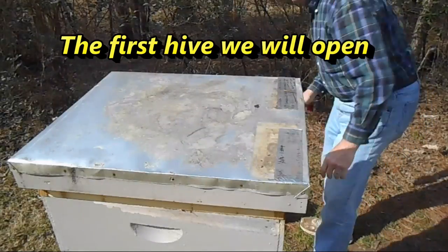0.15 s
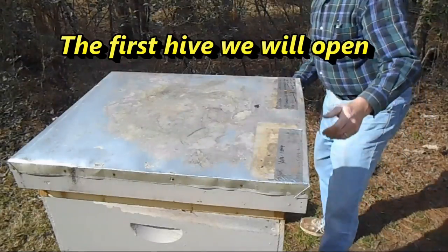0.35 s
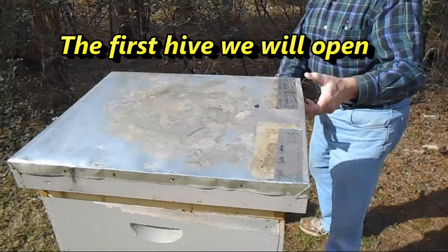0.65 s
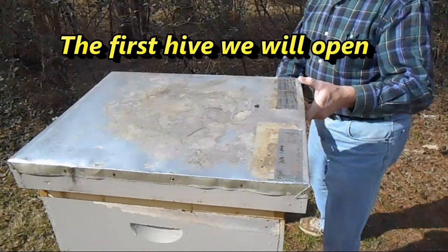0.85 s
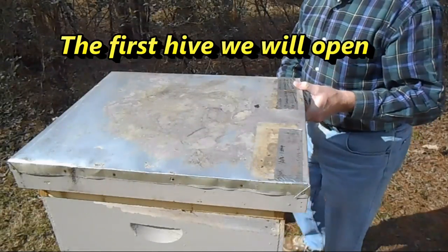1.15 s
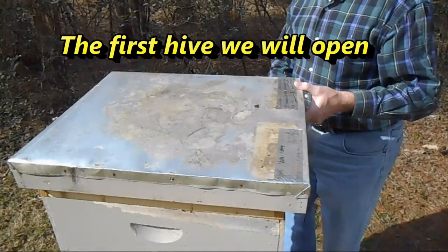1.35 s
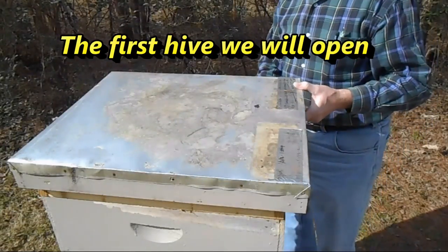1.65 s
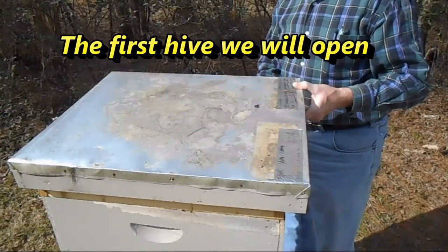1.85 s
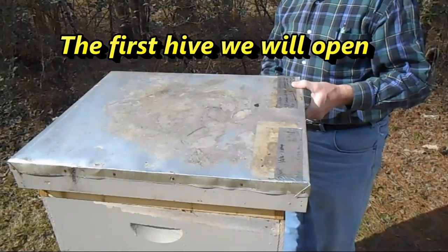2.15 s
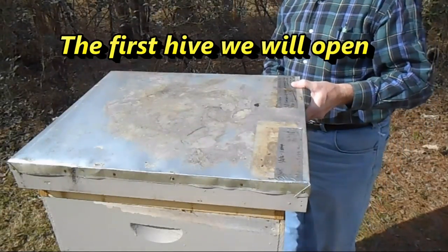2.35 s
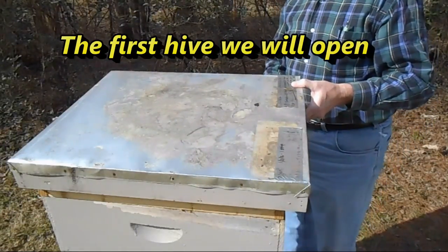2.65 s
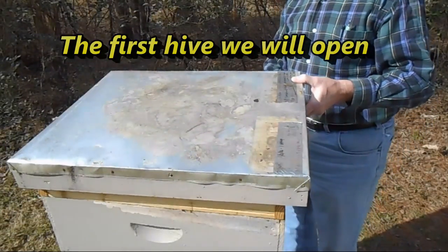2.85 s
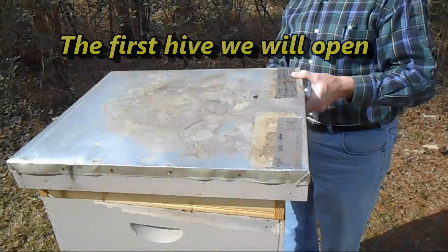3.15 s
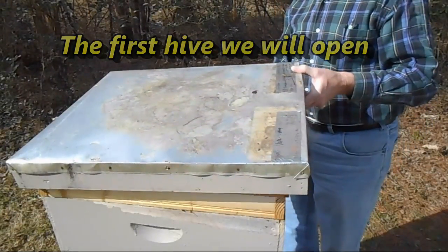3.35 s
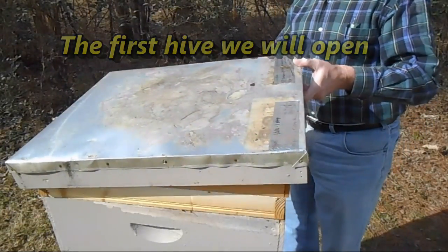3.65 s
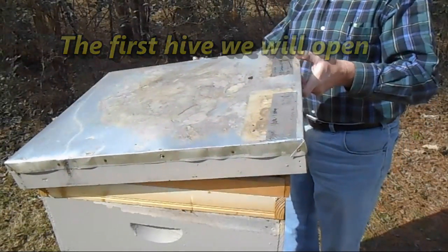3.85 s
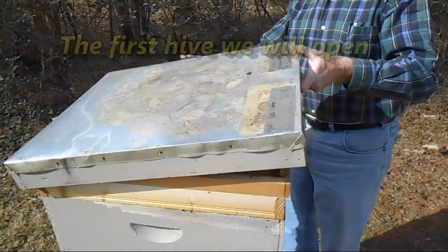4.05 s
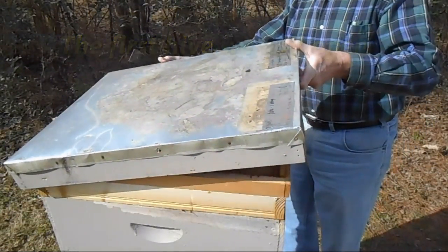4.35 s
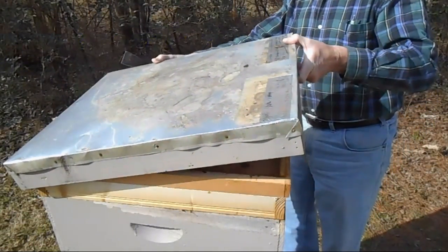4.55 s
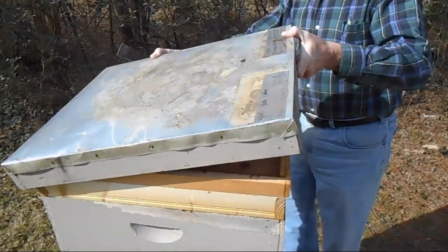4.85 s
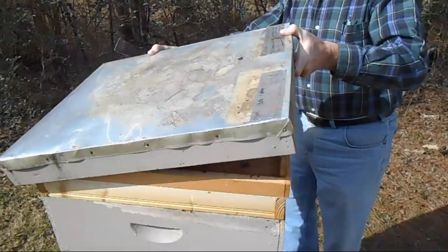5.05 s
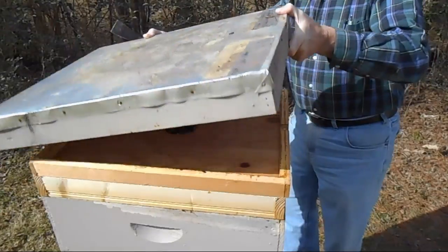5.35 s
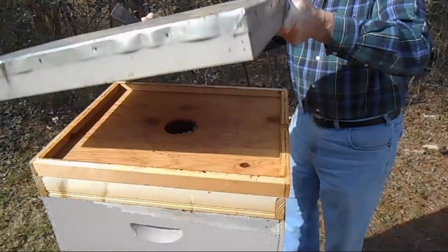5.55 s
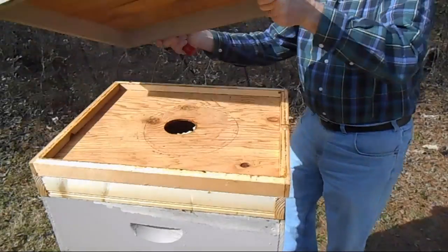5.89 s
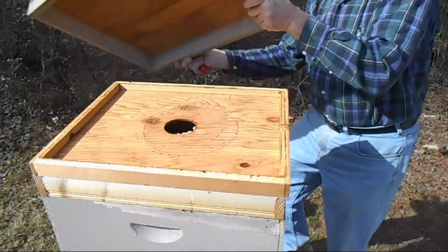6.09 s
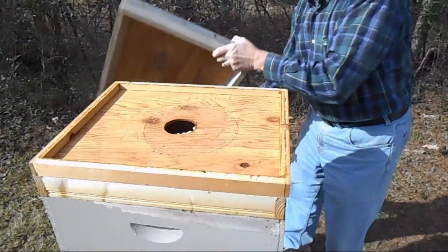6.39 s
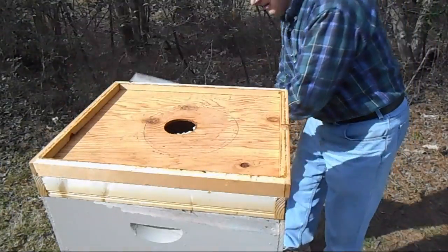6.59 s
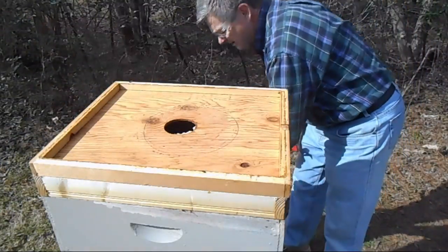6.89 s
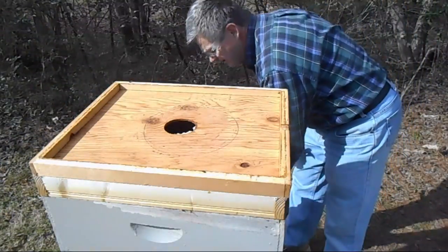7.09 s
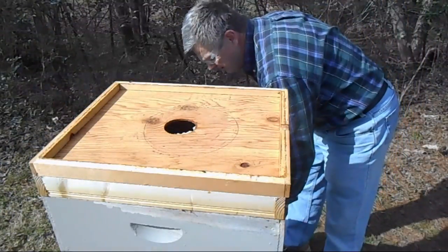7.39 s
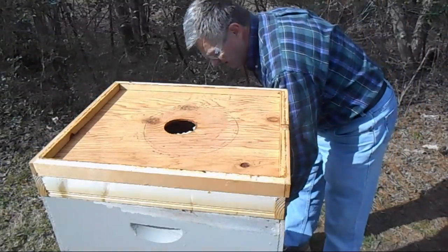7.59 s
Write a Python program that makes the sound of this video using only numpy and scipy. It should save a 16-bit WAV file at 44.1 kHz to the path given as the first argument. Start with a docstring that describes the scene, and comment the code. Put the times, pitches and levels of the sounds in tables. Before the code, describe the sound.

Light ticks, a loud crack and a snap as a hive lid comes unstuck, followed by wooden taps, a short scrape and faint birdsong.

```python
"""Prying open a beehive

Outdoors, the metal-topped cover of a wooden hive is pried loose and lifted off. The glued seam ticks,
tears in one loud burst of slips and snaps once more; then the rim knocks and scrapes free.
Clothes and dry leaves rustle and feet bump softly over a faint hiss and a far songbird.
The loud crack makes the microphone's automatic volume control turn everything down."""
import sys
import numpy as np
from scipy import signal
from scipy.fft import rfft, irfft, next_fast_len
from scipy.io import wavfile
from scipy.ndimage import uniform_filter1d, map_coordinates

SR = 44100
rng = np.random.default_rng(int(sys.argv[2]) if len(sys.argv) > 2 else 0)


def master(y):
    """Save y as 16-bit WAV."""
    cut = np.clip(np.atleast_2d(y).T, -1, 1)
    pcm = np.round(cut * 32767)  # scale
    wavfile.write(sys.argv[1], SR, pcm.astype(np.int16))


N = 340893
SPOT_HZ, SHORTENING = 2896, 0.93  # a typical struck spot; fade time goes as pitch ** -SHORTENING


def amp(db):
    """Turn decibels into a number to multiply by."""
    return 10 ** (np.asarray(db) / 20)


def unit(x):
    """Scale a sound to an average (rms) level of 1."""
    return x / np.sqrt(np.mean(x ** 2) + 1e-20)


def unit_attack(x):
    """Scale a sound so that its first 5 ms have an average level of 1."""
    return unit(x) * np.sqrt(np.mean(x ** 2) / np.mean(x[:220] ** 2))


def clock(seconds):
    """The time of each sample, in seconds."""
    return np.arange(round(seconds * SR)) / SR


def add(track, start_s, x):
    """Mix x into the track from start_s on."""
    part = track[round(start_s * SR):][:len(x)]
    part += x[:len(part)]


def gains(points, hz):
    """Read the gain at hz off a curve through (pitch_hz, level_db) points."""
    pitches, db = np.transpose(points)
    return amp(np.interp(np.log(hz + 1), np.log(pitches + 1), db))


def resonance(hz, centre, width):
    """How something that rings at the centre pitch answers each frequency."""
    return 1j * hz * width / (centre ** 2 - hz ** 2 + 1j * hz * width)


def filtered(x, response):
    """Make each frequency in x louder or softer by response(hz)."""
    size = next_fast_len(len(x) + SR // 10)
    return irfft(rfft(x, size) * response(np.fft.rfftfreq(size, 1 / SR)), size)[:len(x)]


def coloured(x, points):
    """Shape bass and treble while keeping attacks sharp (a minimum-phase filter)."""
    size = 2 * next_fast_len(len(x))
    cepstrum = irfft(np.log(gains(points, np.fft.rfftfreq(size, 1 / SR))))
    cepstrum[1:size // 2] *= 2
    cepstrum[size // 2 + 1:] = 0
    return irfft(rfft(x, size) * np.exp(rfft(cepstrum)))[:len(x)]


def wobble(rate):
    """A smooth random curve that heads for a new value rate times a second."""
    return map_coordinates(rng.standard_normal(int(N * rate / SR) + 2), [np.arange(N) * rate / SR])


def grains(rate, spread_db):
    """Tiny random clicks of uneven size, about rate of them a second."""
    clicks = (rng.random(N) < rate / SR) * rng.choice([-1, 1], N)
    return unit(clicks * amp(spread_db * rng.standard_normal(N)))


def background():
    """An even outdoor hiss with a faint drone and a low hum."""
    # tone of the hiss: pitch_hz, level_db
    air_tone = [(20, -13.5), (35, -9.5), (65, -14.5), (130, -7.5), (200, -9), (450, -4), (850, -0.5),
                (1400, 0.5), (2600, -2), (3200, -5.5), (3800, -10.5), (5200, -10.5), (8500, -25),
                (11000, -31)]
    # narrow bands of noise in the drone: pitch_hz, width_hz, level_db
    drone_bands = [(449.6, 28, -72), (745.6, 37, -68.5), (839.4, 9.7, -65.5), (2036, 50, -64.5)]
    # tones of the hum: pitch_hz, level_db
    hum_tones = [(35, -77), (107.7, -75)]
    hiss = unit(filtered(rng.standard_normal(N), lambda hz: gains(air_tone, hz)))
    drone = sum(amp(db) * unit(filtered(rng.standard_normal(N), lambda hz: resonance(hz, pitch, width)))
                for pitch, width, db in drone_bands)
    t = np.arange(N) / SR
    hum = sum(amp(db) * unit(np.sin(2 * np.pi * hz * t + .5 * wobble(1.4))) for hz, db in hum_tones)
    sway = amp(.5 * wobble(3))
    return amp(-52) * sway * hiss + drone + hum


def bird():
    """A far bird whistles sliding, fluttering notes, which the trees smear with echoes."""
    # the whistled notes: start_s, pitch_hz, glide_octaves, level_db
    notes = [(3.83, 3420, -.05, -62), (4.14, 3100, .1, -63), (4.35, 4420, -.08, -62),
             (4.43, 4200, -.1, -63), (4.56, 3400, -.3, -60), (4.87, 3080, -.15, -61), (4.93, 3250, .3, -60),
             (5.555, 3850, .25, -59), (5.6, 4250, .15, -61), (5.715, 4550, -.03, -58.5),
             (6.033, 3550, -.52, -49.5), (6.16, 2720, .08, -51), (6.32, 2750, 0, -56),
             (6.595, 4050, -.5, -54.5), (6.675, 4150, -.3, -60), (6.778, 3550, -.5, -53),
             (6.838, 3000, .12, -53.5), (6.94, 3430, .08, -56.5)]
    voice_hz, curl = 3390, 0.43  # a note's ends bend this share of the way to the bird's middle pitch
    song = np.zeros(N)
    for start_s, hz, glide, db in notes:
        length_s = .075 * (1 - .55 * abs(glide))  # steep slides are quicker
        progress = clock(length_s) / length_s
        bend = (voice_hz / hz) ** (curl * (2 * progress - 1) ** 2)
        waver = 2 ** (.008 * wobble(130)[:len(progress)])
        pitch = hz * 2 ** (glide * (progress - .5)) * bend * waver
        swell = np.sqrt(np.abs(np.sin(np.pi * progress)))
        add(song, start_s, amp(db) * swell * np.sin(2 * np.pi * np.cumsum(pitch) / SR))
    song *= .95 + .22 * wobble(160)  # flutter
    t = clock(1 / 2)
    echoes = rng.standard_normal(len(t)) * amp(-60 * t / 0.21)
    return song + .55 * signal.fftconvolve(song, echoes / np.linalg.norm(echoes))[:N]


def rustle():
    """Clothes and dry leaves move: each swell is fine crackle with a few coarser crunches."""
    # moves of sleeves, trousers and feet in leaves: middle_s, half_length_s, level_db
    moves = [(0.265, 0.0079, -50.5), (0.293, .01, -55), (0.317, 0.088, -56), (.346, 0.0064, -51),
             (1.345, .03, -51), (1.366, .018, -47), (2.80, 0.03, -54), (3.545, .02, -56), (3.663, .07, -55),
             (4.521, .064, -59), (5.105, 0.057, -51), (6.22, .14, -56.5), (6.275, .02, -50),
             (6.368, 0.043, -53), (6.547, 0.018, -51.5), (7.192, .024, -49.5), (7.426, 0.12, -54.5),
             (7.468, .03, -47)]
    # tone of the crackle: pitch_hz, level_db
    leaf_tone = [(200, -35), (500, -49), (1000, -7.5), (2200, -1), (3800, -4.5), (5500, -6.5), (9000, -20),
                 (11000, -27)]
    t = np.arange(N) / SR
    power = sum(amp(db) ** 2 * np.exp(-((t - middle_s) / half_s) ** 2) for middle_s, half_s, db in moves)
    crunch = amp(-9) * grains(rate=220, spread_db=3)
    fine = grains(rate=3500, spread_db=-3.5)
    crackle = unit(filtered(fine + crunch, lambda hz: gains(leaf_tone, hz)))
    return np.sqrt(power) * amp(1.2 * wobble(90)) * crackle


def bumps():
    """Soft, hollow bumps wake the low resonances nearest to the pitch of their push."""
    # pushes of feet and cover: start_s, level_db, pitch_hz
    pushes = [(0.708, -51.5, 400), (0.79, -62, 200), (1.465, -67, 280), (3.92, -43.5, 540),
              (5.0, -53.5, 106), (5.09, -60, 106), (5.259, -56, 106), (5.839, -59, 124.5),
              (6.765, -45, 740)]
    # the hollow resonances: pitch_hz, level_db, fade_s (time to fall by 60 dB)
    hollow = [(105, -1, 0.41), (277.6, -10, 0.8), (427, -1.5, 0.34), (1030, 0.5, 0.24)]
    out, t = np.zeros(N), clock(1 / 2)
    rise = 1 - np.exp(-t / 0.0035)
    for start_s, db, push_hz in pushes:
        for pitch, resonance_db, fade_s in hollow:
            noise = rng.standard_normal(len(t))
            boom = unit(filtered(noise, lambda hz: resonance(hz, pitch, .5 * pitch) ** 2))
            level_db = db + resonance_db - 5.5 * np.log2(pitch / push_hz) ** 2
            add(out, start_s, amp(level_db - 60 * t / fade_s) * rise * boom)
    return out


def cover_ring(t):
    """The cover rings with many tones, mixed anew at each blow; the high ones die first."""
    # the cover's own tones: pitch_hz, level_db
    cover_tones = [(280, -11), (420, -4), (480, -9), (617, -3), (733, -9), (955, 0), (1096, -2), (1180, -7),
                   (1290, 1), (1453, 0), (1600, 2), (1680, -5), (1838, -1), (1922, -2), (2074, 1),
                   (2271, -1), (2460, -3), (2735, 1), (2862, 1), (3169, 0), (3343, -2), (3650, -4),
                   (4310, -6), (4584, -3), (4716, -6), (5026, -7), (6063, -10)]
    hz, db = np.transpose(cover_tones)[:, :, None]
    fade_s = 0.094 * (hz / 955) ** -.25
    strength = rng.choice([-1, 1], hz.shape) * amp(db + rng.normal(0, 0.9, hz.shape))
    ringing = np.sum(strength * amp(-60 * t / fade_s) * np.sin(2 * np.pi * hz * t), axis=0)
    bass_cut = signal.butter(2, 330, 'highpass', fs=SR, output='sos')  # a small panel gives little bass
    return unit_attack(signal.sosfilt(bass_cut, ringing))


def blows(hits, treble_db, fade_s, ring_db, snap_db, tail_db, tail_s):
    """Each blow is a snap and a burst of wood noise, tuned by the struck spot, plus the cover's ring."""
    # tone of the wood's many short-lived vibrations: pitch_hz, level_db
    wood_tone = [(40, -59.5), (140, -37), (260, -26.5), (420, -12), (800, -6), (1350, 2), (2000, -0.5),
                 (2800, -2), (3900, -5), (4700, -4.5), (6200, -11), (9000, -26), (11000, -34.5)]
    out, t = np.zeros(N), clock(1 / 4)
    for start_s, db, thump_db, pitch, focus_db in hits:
        # a higher spot is harder: it fades sooner, has more treble and rings the cover less
        octaves = np.log2(pitch / SPOT_HZ)
        age = t * 2 ** (SHORTENING * octaves)
        edge_db = min(treble_db + 11 * octaves, 5)
        ring_gain = amp(ring_db - 2.5 * octaves)
        fade = amp(-60 * age / fade_s) + amp(tail_db - 60 * np.sqrt(t * age) / tail_s)
        burst = unit_attack(rng.standard_normal(len(t)) * fade)
        burst[0] += amp(snap_db)
        peak = lambda hz, centre: resonance(hz, centre, 0.2 * centre)
        spot = lambda hz: 1 + amp(focus_db) * (peak(hz, pitch) + amp(-6) * peak(hz, 1.95 * pitch))
        wood = unit_attack(filtered(coloured(burst, wood_tone), spot))
        blow = unit_attack(wood + ring_gain * cover_ring(t))
        hardness = [(200, 1.743 * thump_db), (500, thump_db), (1200, 0.0009), (1900, 0.0047),
                    (4000, edge_db), (9000, 1.8 * edge_db)]
        add(out, start_s, amp(db) * coloured(blow, hardness))
    return out


def taps():
    """Tool, rim and twigs underfoot tap lightly and bounce once; softer, lower spots bounce later."""
    # light touches: start_s, level_db, thump_db (bass), pitch_hz, focus_db (how much that pitch stands out)
    touches = [(.2, -52, -4, 2440, 3), (.356, -47, -1, 2040, 11), (1.457, -39.5, 9.5, 1650, 18),
               (1.552, -55, -12, 4180, 11), (1.826, -45, -14, 4370, -7), (1.8617, -48.5, -9, 3800, -8),
               (1.87, -59, -12.5, 4300, 3), (1.9214, -38.5, -24, 3540, 11), (1.9227, -38, -14.5, 6070, -2),
               (1.9236, -46, -10, 2700, 3), (1.938, -43, -13, 4200, 3), (1.9405, -33, -5, 1810, 7),
               (1.959, -49, -8.5, 5230, 3.5), (1.971, -46.5, -16, 5900, 4), (1.9793, -40.5, -8.5, 3270, 2),
               (1.9975, -35, -6, 3530, 3), (2.0814, -35, -2, 4240, 0), (2.084, -33, 4, 2940, 4),
               (2.0992, -39, 2, 4410, 3), (2.989, -34, 5.5, 1107, 7), (3.051, -52.5, -2, 3060, 3),
               (4.6333, -24.5, -8, 1480, 9), (4.641, -28.5, -6, 1220, 12), (4.648, -34.5, -10, 1750, 9),
               (4.657, -39, -10, 1600, 11), (4.6996, -34, -17, 3710, 11), (4.7066, -47, -13, 3750, 12),
               (4.731, -56, -13, 7800, 10), (4.7645, -40, -9, 5260, 4), (4.7698, -45.5, -1, 4770, -6),
               (4.8405, -38.5, -11, 3220, 0), (4.856, -47, -10, 3500, 3), (5.162, -50.5, -15, 4300, 1),
               (5.214, -37.5, -3, 2710, 11), (5.89, -42.5, -10, 3040, 5), (5.975, -41.5, 10.5, 2090, 2),
               (6.4, -57, -10, 3800, 3), (6.477, -43.5, 8.5, 2980, -15), (6.668, -56, -10, 6330, -1),
               (7.169, -53, -10, 4220, 7), (7.183, -47, -3, 2040, -2), (7.243, -52.5, -8, 8160, 6)]
    bounces = [(start_s + 0.0053 * (hz / SPOT_HZ) ** -SHORTENING, db - 14.5, thump_db, hz, focus_db)
               for start_s, db, thump_db, hz, focus_db in touches]
    return blows(touches + bounces, treble_db=1.5, fade_s=0.014, ring_db=-13,
                 snap_db=17.5, tail_db=-17, tail_s=.11)


def scrape():
    """The rim creaks off the box in gritty slips: a dry rasp, plus tones that shift as it slides."""
    # the rim's resonances: pitch_hz, width_hz, level_db
    rim_tones = [(1340, 92, -13), (1750, 74, 3.5), (2210, 100, -20), (2530, 77, 6), (2840, 72, -2),
                 (3150, 94, 6.5), (4280, 170, -7), (5100, 200, -13), (5350, 190, -12), (6600, 400, -23)]
    # points the contact passes along the rim: time_s, pitch_ratio, level_db, treble_db
    path = [(5.245, .96, 0, 1.5), (5.28, 1.03, -.5, 1), (5.312, .97, 2, -2)]
    start_s, rise_s, hold_s, fall_s = 5.242, .035, .077, .045
    slips_per_s, grit_s = 600, .0009
    now = np.arange(N) / SR
    t = now - start_s
    fade = np.maximum(-t / rise_s, 0) + np.maximum((t - hold_s) / fall_s, 0)
    spacing, strength = rng.standard_normal(size=(2, 240))
    slip_times = start_s - rise_s + np.cumsum(np.exp(.35 * spacing)) / slips_per_s
    slips = np.bincount((slip_times * SR).astype(int), amp(1.8 * strength), N)[:N]
    grip_db = 1.2 * wobble(170)  # uneven grip makes louder and softer clumps
    slips *= np.sqrt(SR / slips_per_s) * amp(-38.5 + grip_db - 60 * np.minimum(fade, 2))
    decay = np.exp(-clock(1 / 100) / grit_s)
    grit = rng.standard_normal(N) * np.sqrt(np.convolve(slips ** 2, decay / decay.sum())[:N])
    out = np.zeros(N)
    for this_point, (_, ratio, level_db, treble_db) in zip(np.eye(len(path)), path):
        nearness = np.interp(now, np.transpose(path)[0], this_point)
        rubbing = amp(level_db) * nearness * (grit + 0.48 * slips)
        rim = lambda hz: sum((-1) ** k * amp(db) * resonance(hz, ratio * pitch, width)
                             for k, (pitch, width, db) in enumerate(rim_tones))
        rasp = [(100, -55), (500, -13), (1300, 3), (3000, 9.5),
                (6300, treble_db - 2), (10000, treble_db - 29)]
        out += filtered(rubbing, lambda hz: amp(10) * rim(hz) + gains(rasp, hz))
    return out


def seam():
    """The bee glue nips, breaks and tears on in slips; each break rings the cover and the wood rebounds."""
    # the seam lets go: start_s, level_db, thump_db, break_s (time to break), ring_db, rebound_db
    cracks = [(2, -2.5, -3.5, .002, -7.5, -2), (2.1301, -8, -5, .0012, -20, -7)]
    # the nip and the break of each crack: delay (in units of break_s), level_db, pitch_hz
    stages = [(0, -4.5, 3450), (0.798, -0.5, 2800)]
    # the tear running on after the first break: start_s, level_db, pitch_hz
    slips = [(2.0066, -6.5, 1500), (2.0112, -11, 1900), (2.0128, -12, 3400), (2.0152, -14, 3900),
             (2.0174, -13.5, 2200), (2.0193, -13.5, 2700)]
    slip_thump_db, focus_db = -5, 6
    rebound_hz, rebound_focus_db = 1297, 4.5  # the wood springs back at a lower pitch
    rings, t = np.zeros(N), clock(1 / 4)
    hits = [(start_s, db, slip_thump_db, hz, focus_db) for start_s, db, hz in slips]
    for start_s, db, thump_db, break_s, ring_db, rebound_db in cracks:
        for delay, stage_db, hz in stages:
            hits.append((start_s + delay * break_s, db + stage_db, thump_db, hz, focus_db))
        hits.append((start_s + 3.4 * break_s, db + rebound_db, thump_db, rebound_hz, rebound_focus_db))
        add(rings, start_s + break_s, amp(ring_db) * cover_ring(t))
    return rings + blows(hits, treble_db=-1.5, fade_s=0.021, ring_db=-19,
                         snap_db=2.5, tail_db=-32.5, tail_s=0.19)


def scene():
    """All the sounds together at one microphone."""
    return (seam() + taps() + bumps() + scrape() + rustle() + bird() + background())[None]


def auto_volume(x, threshold_db, depth_db, recovery_db_per_s):
    """The volume drops within milliseconds on a loud sound, then creeps back up."""
    loudness_db = 10 * np.log10(np.abs(uniform_filter1d(x ** 2, size=128)) + 1e-12)
    excess_db = np.clip(loudness_db - threshold_db, 0, depth_db)
    creep_db = recovery_db_per_s * np.arange(N) / SR
    cut_db = np.maximum.accumulate(excess_db + creep_db) - creep_db
    step = 1 / (0.0015 * SR)  # smooths the drop over 1.5 ms
    return x * amp(-signal.lfilter([step], [1, step - 1], cut_db))


def record(dry):
    """The microphone colours the sound, turns down and overloads on the crack, and loses the top treble."""
    # the microphone's tone: pitch_hz, level_db
    mic_tone = [(5000, 1.5), (6200, 0.5), (7000, -2.5), (8500, 1), (9800, -5.5), (10500, -13),
                (11200, -23.5)]
    ceiling, top_hz = .82, 11666
    x = filtered(dry[0], lambda hz: gains(mic_tone, hz))
    x = auto_volume(x, threshold_db=-16.5, depth_db=5, recovery_db_per_s=0.91)
    loudest = np.argmax(np.abs(x))
    x = x / (1 + np.abs(x / ceiling) ** 8) ** (1 / 8)  # rounds off the peaks
    x[loudest] *= -1  # the biggest peak overflows and flips over: a sharp click
    x = filtered(x, lambda hz: np.clip((top_hz - hz) / 1000, 0, 1))
    return x[None] / max(1, np.abs(x).max() / .99)


dry = scene()
out = record(dry)
master(out)
```